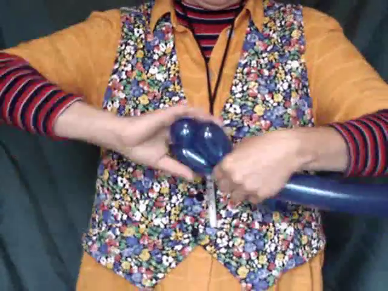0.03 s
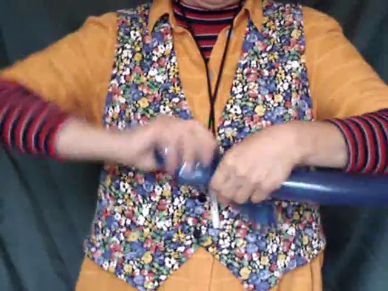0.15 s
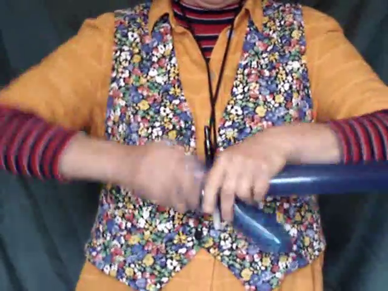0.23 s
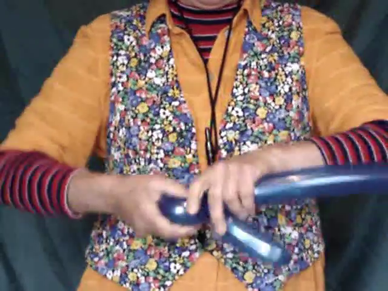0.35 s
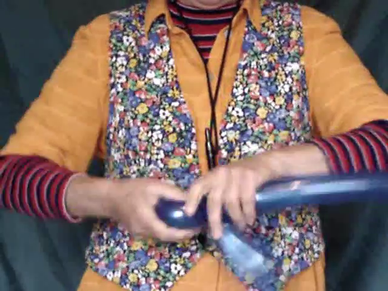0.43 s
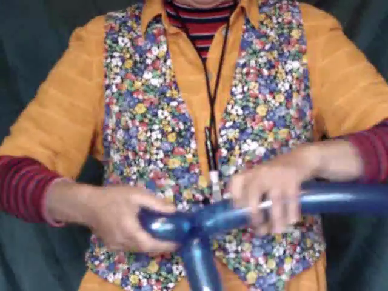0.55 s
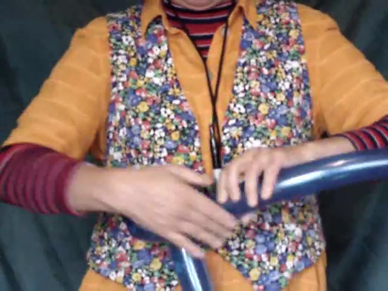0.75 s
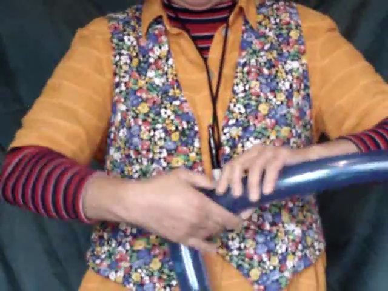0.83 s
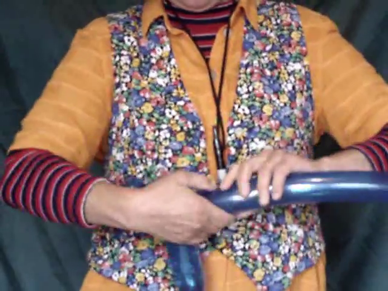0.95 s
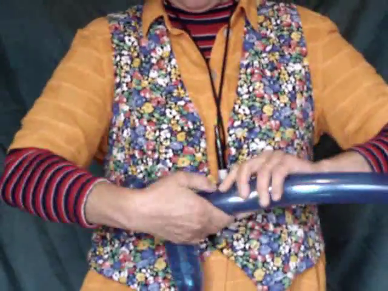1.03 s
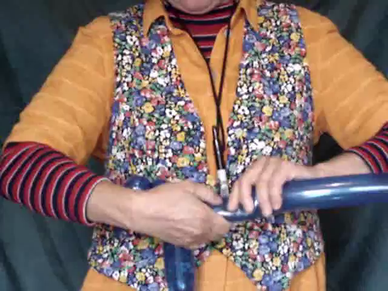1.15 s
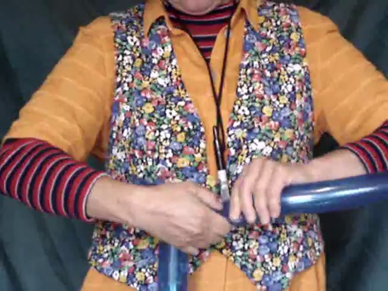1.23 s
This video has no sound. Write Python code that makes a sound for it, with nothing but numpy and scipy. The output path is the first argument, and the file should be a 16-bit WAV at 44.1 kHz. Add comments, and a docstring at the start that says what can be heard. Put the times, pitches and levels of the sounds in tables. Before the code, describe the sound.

Hands twist a long balloon with ticks, sharp snaps and a squeak in a small room.

```python
"""Light ticks of tightening rubber come first, as hands twist a long balloon in a small, live room.
The taut skin lets go in a volley of snaps, creaks and squeaks by stick-slip friction, snaps again
and groans as the twist relaxes; then the fingers shift their grip with a few soft rubs.
The slips are impulses that excite the resonances of the enclosed air,
and the room answers with reverberation over a soft, steady noise."""
import sys
import numpy as np
from scipy import signal
from scipy.fft import rfft, irfft
from scipy.io import wavfile
from scipy.ndimage import uniform_filter1d

SR = 44100
rng = np.random.default_rng(int(sys.argv[2]) if len(sys.argv) > 2 else 0)


def log_audio(samples):
    """Write samples as a 16-bit WAV file to the path given in sys.argv[1]."""
    # one column per channel
    frames = np.atleast_2d(samples).T
    # limit to full scale, then quantise
    limited = np.clip(frames, -1, 1)
    pcm = np.round(limited * 32767).astype(np.int16)
    wavfile.write(sys.argv[1], SR, pcm)


N = 57330


def ticks_and_snaps(tick_db=-6, snap_db=5):
    """Sudden release of strain radiates a pulse: with a shiver nearby, bare as it drives the resonances."""
    # ticks of the tightening rubber: t/s, relative level/dB
    tick_events = [(.0005, -43), (.0331, -8.5), (0.0525, -6), (0.0666, -4), (0.079, -20), (.0936, -2.5),
                   (.112, -3), (0.1147, -0.5), (0.1325, -30), (0.1441, -1.5), (0.174, -28), (0.1799, -2.5),
                   (0.1866, 0), (.2101, -31), (.2283, -8), (0.6814, -27), (0.6918, -1.5), (.6948, -9.5),
                   (.7166, -31), (0.9214, -19), (0.9474, -18), (1.051, -19)]
    # snaps of the taut skin: t/s, relative level/dB, spectral tilt/(dB per octave)
    snap_events = [(.239, -7, -4), (0.2401, -8, 4.5), (0.2473, 2.5, -1.5), (.253, -2, 0.5),
                   (0.2593, -0.5, -1.5), (.2658, 1, 1), (.2934, -3, -1), (0.3012, -5.5, 1.5),
                   (0.3897, -7, 5), (0.4199, -4, 0.5), (0.4287, -0.5, 0), (.4445, -13, -4.5),
                   (0.4459, -4, 0), (0.4569, -6.5, 1), (0.4808, -4, -0.5), (.515, -18.5, 4),
                   (.5443, -16.5, -2), (.5487, 2, 0)]
    # spectra of a tick and of a snap: f/Hz, level/dB
    tick_colour = [(40, -25), (200, -24), (500, -5), (1000, -5.5), (2700, 0), (4200, -7.5), (7000, -13.5),
                   (9800, -19), (10800, -26), (13000, -26), (15500, -22)]
    snap_colour = [(40, -23), (150, -24), (350, -20), (650, -10), (1400, -1), (2700, 1.5), (4000, -0.5),
                   (6500, -7.5), (9500, -11), (10800, -24), (13000, -25), (15500, -20.5)]
    ticks = [(s, amp(tick_db + db) * pulse(tick_colour)) for s, db in tick_events]
    snaps = [(s, amp(snap_db + db) * pulse(snap_colour, tilt)) for s, db, tilt in snap_events]
    near, drive = np.zeros((2, N))
    for slips, drive_db, shiver_s in (ticks, 1, 0.003), (snaps, 2, 0.0017):
        for s, slip in slips:
            add(near, s, signal.fftconvolve(slip, shiver(shiver_s)))
            add(drive, s, amp(drive_db) * slip)
    return near, drive


def squeak():
    """Stick-slip friction: the rate of slipping is heard as a pitch, which dips and recovers."""
    # slip rate: t/s, f/Hz
    rate = [(.368, 468.5), (.378, 452), (.386, 298), (.396, 299.5), (.404, 336.5), (.42, 470), (.46, 391),
            (.54, 422)]
    # slip strength: t/s, relative level/dB
    levels = [(.364, -38), (0.373, -12.5), (0.385, -7), (0.401, -5), (0.419, -7), (0.435, -27), (.457, -11),
              (.475, -19.5), (0.541, -40)]
    # spectrum of one slip: f/Hz, level/dB
    colour = [(40, -36), (380, -30), (560, -5.5), (950, -1), (1350, 3.5), (1750, 3), (2300, 7.5), (3100, 3),
              (3700, -8.5), (5000, -1), (7000, -15.5), (9500, -12), (11500, -29), (15500, -17.5)]
    return stick_slip(rate, levels, colour)


def creak():
    """Slower stick-slip friction after the volley of snaps, falling in pitch."""
    # slip rate: t/s, f/Hz
    rate = [(.26, 329.5), (.34, 260.5)]
    # slip strength: t/s, relative level/dB
    levels = [(.262, -23), (0.284, -6.5), (.3, -17.5), (.325, -20), (.345, -26)]
    # spectrum of one slip: f/Hz, level/dB
    colour = [(40, -29), (400, -36), (680, 1.5), (1100, -9), (2200, 1), (2950, 12), (3700, -15),
              (7000, -15), (9500, -26), (11500, -27), (15500, -17)]
    return stick_slip(rate, levels, colour)


def stick_slip(rate, levels, colour, gain_db=3.5, spread_db=2.5, jitter_cycles=0.1):
    """Relaxation oscillation: rubber grips rubber and slips once a cycle, uneven in time and strength."""
    start_s, end_s = levels[0][0], levels[-1][0]
    cycles = np.cumsum(curve(rate) * (np.arange(N) / SR > start_s)) / SR
    slips, level = np.zeros(N), curve(levels)
    for k, (late, size) in enumerate(rng.standard_normal((120, 2))):
        at = np.searchsorted(cycles, k + 1 + jitter_cycles * late)
        slip = shiver()
        if at < end_s * SR:
            add(slips, at / SR, amp(gain_db + level[at] + spread_db * size) * slip)
    return convolve(slips, pulse(colour))


def pulse(colour, tilt_db=0, size=2048):
    """One slip as a minimum-phase pulse, the most compact causal signal with this spectrum."""
    hz = abs(np.fft.fftfreq(size, 1 / SR))
    octaves = np.log2(np.maximum(hz, 500) / 2500)
    log_gain = np.log(amp(spectrum_at(colour, hz) + tilt_db * octaves))
    spectrum = np.exp(np.conj(signal.hilbert(log_gain)))
    return -np.fft.ifft(spectrum).real[:size // 2]


def shiver(decay_s=0.0017, shiver_db=1, size=530):
    """Damped vibration: a unit impulse and the skin's brief shiver after it, different every time."""
    out = rng.standard_normal(size) * np.exp(-np.arange(size) / SR / decay_s)
    out *= amp(shiver_db) / np.linalg.norm(out)
    out[0] += 1
    return out


def rubs(wobble_depth=0.14, flutter_db=1.5, rise_s=0.0023):
    """Friction on slack rubber: wavering harmonics and scrape, mostly sagging in pitch as it gives way."""
    # rubs and groans: t/s, duration/s, start f/Hz, end f/Hz, level/dB,
    # overtone fall/(dB per octave), scrape against tone/dB
    strokes = [(.0, .012, 962, 890, -41.5, 12, -3.5), (0.059, 0.092, 774, 756, -49, 2.5, -8),
               (.152, 0.034, 252.8, 211.6, -40, 3.5, -12), (0.166, 0.085, 617, 564, -42.5, 9.5, -2),
               (0.296, 0.054, 770, 607, -39, 12, 1), (0.372, 0.031, 924, 864, -31.5, 14, -28),
               (0.379, 0.029, 595.4, 586, -29, 5, -29), (.396, 0.027, 1065, 1163, -24.5, 3, -9),
               (0.546, 0.013, 827, 550, -25.5, 2.5, 4), (.561, 0.021, 570, 500, -40, 29, -24),
               (.578, 0.023, 386, 376, -33.5, 10, -21), (.579, 0.038, 268.2, 238.7, -31.5, 5.5, -29),
               (.61, 0.032, 167, 152, -50, 13, -24), (0.623, 0.016, 312, 295, -37.5, 0, -18),
               (0.634, 0.017, 399, 390, -42, 22, -22), (0.644, 0.058, 244, 239, -44.5, 18, -4),
               (.692, 0.0094, 986, 913, -30.5, 4.5, -6), (.86, 0.012, 453, 426, -49, 13, -6.5),
               (0.921, 0.015, 613, 591, -41.5, 11.5, -1.5), (0.942, 0.015, 663, 537, -52, 2, 1),
               (0.997, 0.1, 613, 563, -60.5, 14, -14), (1.032, 0.056, 935, 869, -57, 17, 4.5),
               (1.129, 0.023, 1028, 782, -50.5, 12.5, -0.5), (1.176, 0.022, 1090, 1005, -57.5, 5, 3),
               (1.25, 0.038, 854, 780, -62, 14, -6)]
    out, harmonic = np.zeros(N), np.arange(1, 9)[:, None]
    scrape = crackle(per_s=4000, spread_db=0)
    wobble, flutter = unit(uniform_filter1d(rng.standard_normal((2, N)), size=90))
    for s, length, start_hz, end_hz, db, fall_db, scrape_db in strokes:
        t = np.arange(0, length, 1 / SR)
        now = (round(s * SR) + np.arange(len(t))) % N
        hz = start_hz * (end_hz / start_hz) ** (t / length) * (1 + wobble_depth * wobble[now])
        phase = 2 * np.pi * np.cumsum(hz) / SR
        tone = (amp(-fall_db * np.log2(harmonic)) * np.sin(harmonic * phase)).sum(0)
        sound = unit(tone * amp(flutter_db * flutter[now])) + amp(scrape_db) * unit(scrape[now])
        envelope = np.minimum(t / rise_s, 1) * abs(1 - t / length) ** 0.55
        add(out, s, amp(db) * sound * envelope)
    return out


def grip():
    """Micro-slip: the fingers creep over the rubber with a fine crackle."""
    # crackle strength: t/s, level/dB
    levels = [(0, -53), (.1, -46), (.19, -51.5), (.23, -57), (.66, -54), (.8, -71.5), (.9, -68.5),
              (.95, -57), (1.05, -69), (1.2, -68), (1.3, -60)]
    return crackle(per_s=1500, spread_db=2.5) * amp(curve(levels))


def crackle(per_s, spread_db):
    """Shot noise: tiny independent slips of skin on rubber, at an rms of 1."""
    # dull spectrum of dragging skin: f/Hz, relative level/dB
    colour = [(40, -35), (150, -17.5), (300, -4), (600, -1.5), (1000, -1), (1700, 3), (2700, -3),
              (4200, -7.5), (7000, -17), (9800, -13.5), (10700, -34), (13000, -27), (15500, -19)]
    slips = (rng.random(N) < per_s / SR) * amp(spread_db * rng.standard_normal(N))
    return unit(convolve(slips, pulse(colour)))


def air_pushes(decay_s=0.0019):
    """Displaced air: each jerk of the balloon sends out one compression and rarefaction."""
    # jerks: t/s, peak level/dB
    jerks = [(.004, -37.5), (0.076, -53), (.115, -39), (0.2468, -33.5), (0.5491, -34.5)]
    out, age = np.zeros(N), np.arange(SR // 20) / SR / decay_s
    for s, db in jerks:
        add(out, s, amp(db) * (1 - age) * np.exp(-age))
    return out


def cavity_ring(slips, t60_s=0.16):
    """Cavity resonance: the slips excite damped modes of the air inside the balloon."""
    # air modes: f/Hz
    mode_hz = [894, 1048, 1615, 2047, 2178, 2343, 2671, 2987]
    # their strengths against the bare slip: level/dB
    mode_db = [-60, -52, -69, -45.5, -47, -56, -47, -48]
    t = np.arange(SR // 2) / SR
    modes = (amp(db - 60 * t / t60_s) * np.cos(2 * np.pi * hz * t) for hz, db in zip(mode_hz, mode_db))
    return convolve(slips, sum(modes))


def room(sound, fade_s=0.03, count=3):
    """Reflection paths change as the balloon moves: equal-power fades cycle through room responses."""
    place = np.arange(N) / SR / fade_s
    shares = [np.sin(np.pi / 2 * np.minimum((place + k) % count, 2)) for k in range(count)]
    return sum(convolve(sound * share, room_response()) for share in shares)


def room_response(tail_db=4, build_s=0.0017):
    """Reverberation: a few early reflections and a diffuse tail that decays exponentially in each band."""
    # spectrum that the room returns: f/Hz, relative level/dB
    colour = [(40, -32), (130, -4), (250, 4), (420, -2.5), (600, 1), (1200, 0), (3000, 1), (6000, -3),
              (15000, 1)]
    # reverberation time: f/Hz, T60/s
    t60 = [(100, 0.21), (250, 0.35), (700, 0.36), (2000, 0.28), (5000, 0.29), (9000, 0.27), (15000, 0.37)]
    # early reflections: delay t/s, gain
    reflections = [(.0011, -0.041), (.0029, -0.072), (.0043, -0.11), (.0086, -0.081)]
    hz, t, bands = signal.stft(rng.standard_normal(SR), SR, nperseg=256)
    band_db = spectrum_at(colour, hz)[:, None] - 60 * t / spectrum_at(t60, hz)[:, None]
    _, tail = signal.istft(bands * amp(band_db), SR, nperseg=256)
    tail *= 1 - np.exp(-np.arange(len(tail)) / SR / build_s)
    tail *= amp(tail_db) / np.linalg.norm(tail)
    for s, gain in reflections:
        add(tail, s, np.array([gain]))
    return tail


def background(level_db=-57.5):
    """Stationary noise of the room, soft and strongest at low frequencies."""
    # spectral density: f/Hz, relative level/dB
    density = [(15, -46), (25, -19.5), (175, -10.5), (217, -11.5), (285, -7), (317, -12), (451, -11),
               (516, -17), (677, -15), (734, -19), (1260, -20.5), (1560, -18), (1740, -20), (3430, -22),
               (3720, -24.5), (7510, -23), (16000, -43.5)]
    gain = amp(spectrum_at(density, np.fft.rfftfreq(N, 1 / SR)))
    return amp(level_db) * unit(irfft(rfft(rng.standard_normal(N)) * gain, N))


def amp(db):
    """Decibels to amplitude ratio."""
    return 10 ** (np.asarray(db) / 20)


def unit(x):
    """Normalisation to an rms of 1."""
    return x / np.sqrt(np.mean(x ** 2) + 1e-20)


def spectrum_at(points, hz):
    """Interpolation on a log-frequency axis."""
    f, value = np.transpose(points)
    return np.interp(np.log(hz + 1), np.log(f + 1), value)


def curve(points):
    """Linear interpolation in time, at every sample."""
    return np.interp(np.arange(N) / SR, *np.transpose(points))


def add(mix, s, sound):
    """Superposition of a sound on the mix at time s."""
    part = mix[max(0, round(s * SR)):][:len(sound)]
    part += sound[:len(part)]


def convolve(x, response):
    """Linear filtering, cut to the length of the scene."""
    return signal.fftconvolve(x, response)[:N]


def scene():
    """Superposition of the balloon's direct sound, the reverberant field and the background."""
    near, drive = ticks_and_snaps()
    rubbing = rubs()
    friction = squeak() + creak() + grip()
    direct = near + friction + rubbing + air_pushes() + cavity_ring(drive + friction)
    reverberant = room(drive + friction + amp(-5.5) * rubbing)
    return (direct + reverberant + background())[None]


def record(dry):
    """Band limiting: a linear-phase low-pass removes the highest treble."""
    low_pass = signal.firwin(401, cutoff=15950, window=("kaiser", 8), fs=SR)
    return signal.oaconvolve(dry, low_pass[None], "same")


dry = scene()
out = record(dry)
log_audio(out)
```